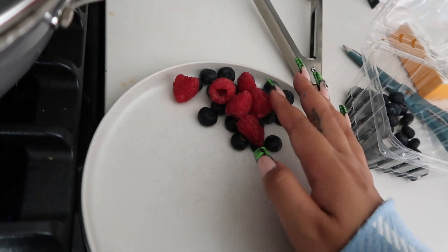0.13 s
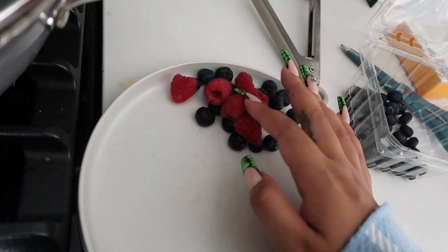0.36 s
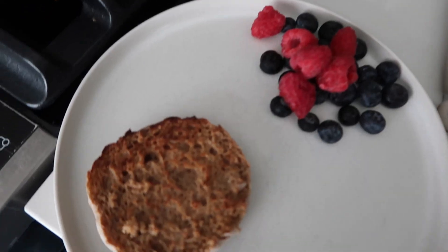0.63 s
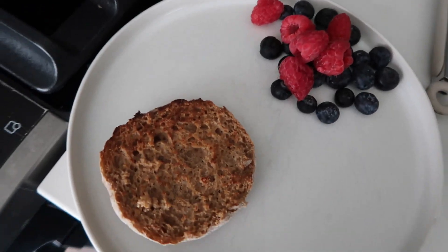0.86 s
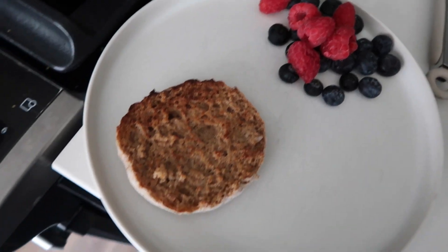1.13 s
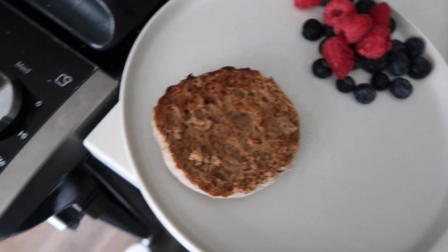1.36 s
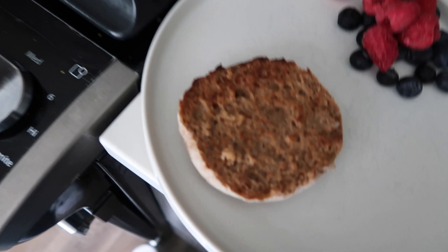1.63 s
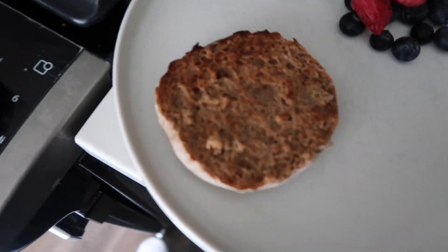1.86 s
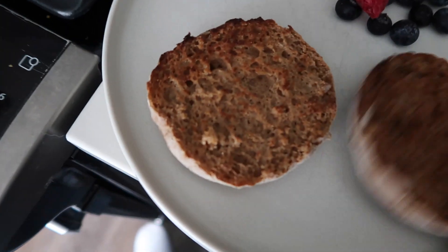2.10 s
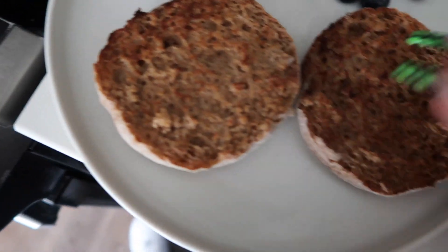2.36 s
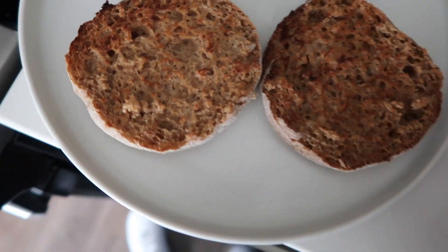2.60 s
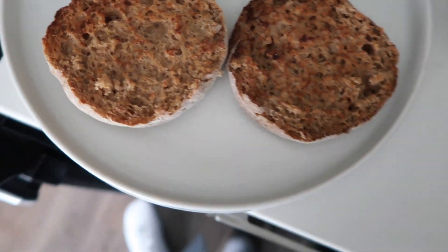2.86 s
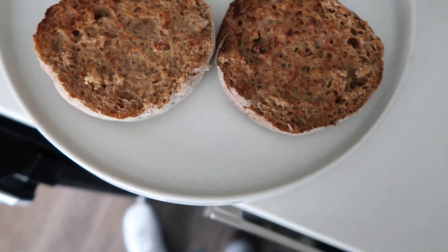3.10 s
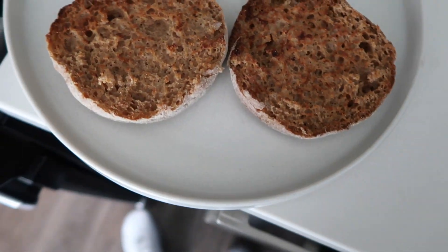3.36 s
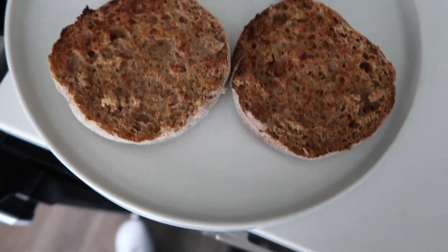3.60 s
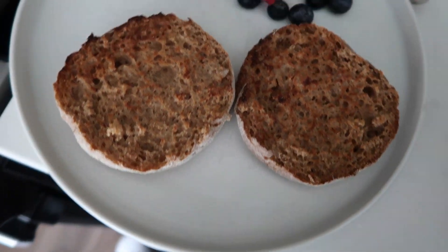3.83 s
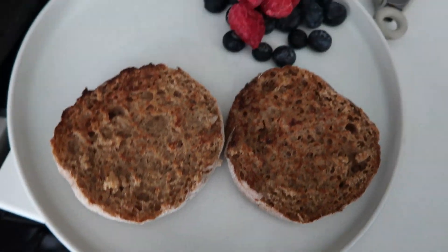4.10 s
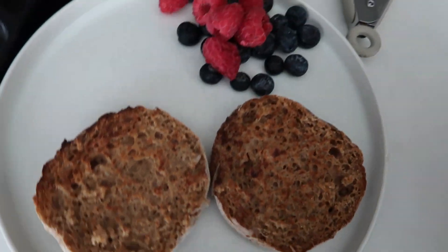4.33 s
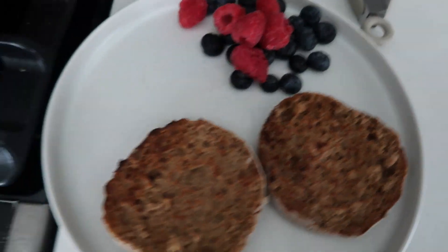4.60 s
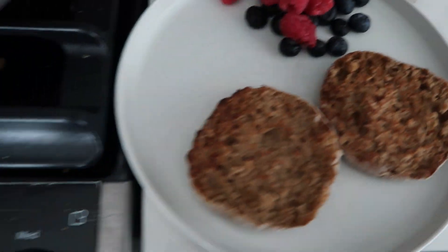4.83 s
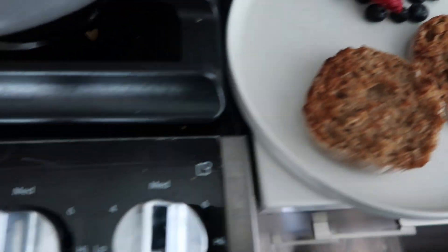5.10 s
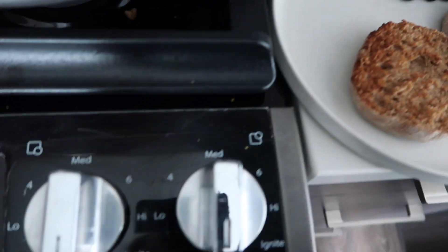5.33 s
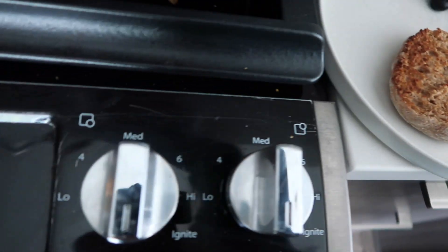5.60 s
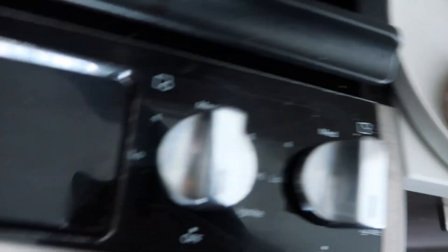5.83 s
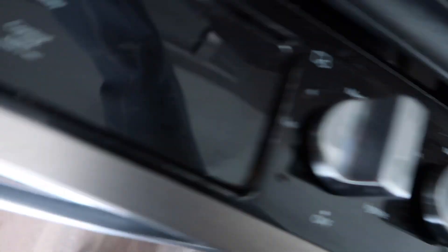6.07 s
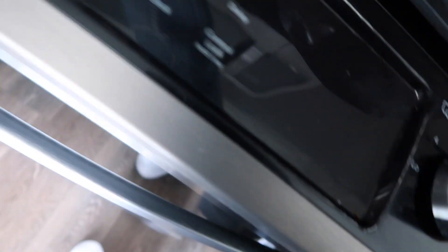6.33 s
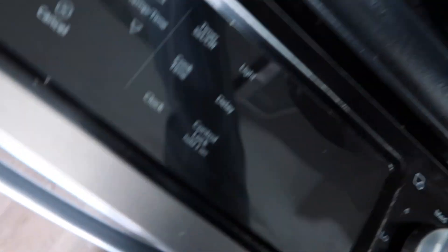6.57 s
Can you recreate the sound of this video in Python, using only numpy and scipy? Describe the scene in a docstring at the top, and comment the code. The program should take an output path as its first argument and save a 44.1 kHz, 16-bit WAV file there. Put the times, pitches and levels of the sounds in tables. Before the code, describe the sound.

Close in a home kitchen, fat sizzles and spits softly over faint room air and hum. Light taps and brushes touch the counter, then toast clatters onto a ceramic plate. A wooden drawer slightly to the right knocks, slides grittily and stops. After quieter sizzling and small ticks, the pan flares with hiss, a thin steam whistle and snapping drops. Finally an oven door bangs open, loud and rattling. Handheld stereo microphone.

```python
"""A home kitchen, heard close by a hand-held camera. Fat sizzles and spits from the start: dense random clicks,
coloured, also ring the pan. Under it lie filtered-noise room air, drone and thumps. Taps ring counter modes and
noise grains brush; at 2.1 s toast rings a plate, and from 2.8 s a drawer knocks loose, slides as resonant grit
and stops. From 5.3 s the tilted pan flares, steam whistles as a wandering tone and drops snap as noise clicks.
At 6.4 s an oven door is pulled open: loud blows and chatter ring sheet metal. Sparse echoes add the kitchen."""
import sys
import numpy as np
from scipy import signal
from scipy.fft import rfft, irfft, next_fast_len
from scipy.io import wavfile
from scipy.ndimage import uniform_filter1d, map_coordinates

SR = 44100
rng = np.random.default_rng(int(sys.argv[2]) if len(sys.argv) > 2 else 0)


def log_audio(samples):
    """Write samples as a 16-bit WAV file to the path given in sys.argv[1]."""
    # one column per channel
    frames = np.atleast_2d(samples).T
    # limit to full scale, then quantise
    limited = np.clip(frames, -1, 1)
    pcm = np.round(limited * 32767).astype(np.int16)
    wavfile.write(sys.argv[1], SR, pcm)


def volts_from_db(level):
    """Convert decibel levels to linear amplitude ratios."""
    exponent = np.asarray(level, float) / 20
    return 10 ** exponent


N = 295470
HZ = np.fft.rfftfreq(next_fast_len(N + SR), 1 / SR)  # frequency axis for colouring

# colour of the sizzling fat: (frequency [Hz], relative level per Hz [dB])
FIZZ_COLOUR = [(180, -25), (300, 6), (397, 0), (600, 4.5), (835, 4.5), (1070, 5), (1390, 1.5), (2570, 3.5),
               (5770, 0.5), (13000, -2), (15500, -21)]
# resonances of the pan: (frequency after the opening [Hz], width [Hz], relative level [dB])
PAN_MODES = [(1030, 27, 6.5), (1659, 11, 5), (2444, 42, 0), (2923, 24, 7), (3366, 16, 0), (4370, 18, 3),
             (4790, 58, -3), (5370, 36, -3), (5920, 45, 0), (9070, 100, 4), (11130, 320, 10.5),
             (13300, 110, 3.5)]
# fat spitting: (time [s], level before the rise and fall [dB])
FAT_SPITS = [(0.0024, -45), (0.0644, -49), (0.129, -38.5), (0.1894, -49), (0.373, -40), (0.4, -36.5),
             (0.437, -37), (0.4644, -36.5), (1.4694, -49), (1.7094, -48), (5.163, -41.5), (5.4544, -35),
             (5.6094, -40), (5.6371, -39), (5.697, -32), (5.7538, -35), (5.948, -42.5), (6.0194, -35),
             (6.0844, -43), (6.342, -42)]
# treble of the fizz against its middle: (time [s], level [dB])
FIZZ_TREBLE = [(0, -1.5), (.2, 3), (.8, 2), (2, 8.5), (3.7, 1.5), (4.2, 4.5), (5.1, 6), (5.4, -2),
               (5.9, -3.1), (6.1, -11), (6.4, -8)]
# how hard the bursts drive the pan: (time [s], level [dB])
PAN_DRIVE = [(0, -21.5), (.4, -23.5), (.55, -31), (1.4, -35.5), (1.8, -31), (4.2, -35.5), (5, -28),
             (5.2, -30.5), (5.35, -26)]
# the pan's ring fades out under the flare: (from [s], to [s])
RING_FADE = (5.3, 5.5)
# colour of the quiet air: (frequency [Hz], relative level per Hz [dB])
AIR_COLOUR = [(12, -27), (20, -5.5), (197, -1.5), (232, -4.5), (287, -1), (346, -3), (691, -7.5),
              (927, -11.5), (1070, -9), (3000, -19), (3900, -49), (6600, -120)]
# left-right likeness of the air: (frequency [Hz], likeness from -1 to 1 [no unit])
AIR_LIKENESS = [(60, 1), (180, 0.7), (550, 0.14), (1650, 0.46), (4970, -0.91), (15000, -0.02)]
# appliance drone: (frequency [Hz], width [Hz], level [dB])
DRONE = [(96, 1.6, -61), (192.6, 8, -65.5), (63, 13, -63)]
# low thumps, and one faint swell of the drone at 1.8 s: (time [s], level [dB], centre [Hz])
LOW_THUMPS = [(0.01, -45, 140), (.36, -44, 132), (1.8, -63, 96), (2.25, -37, 170), (2.87, -48, 124),
              (3.13, -51, 180), (3.35, -52.5, 185), (3.59, -43, 169), (4.07, -62, 104), (4.75, -51.5, 103),
              (5.17, -46.5, 102.5), (5.5, -55, 170)]
# small things ticking: (time [s], middle peak [dB], middle centre [Hz], low peak [dB], treble peak [dB])
SMALL_TAPS = [(.361, -61, 506, -45, -48), (.989, -42, 600, -37, -24), (1.03, -47, 447, -40, -56),
              (1.255, -51, 420, -44.5, -58), (1.272, -43, 1870, -37, -56), (4.073, -51, 2900, -61, -30),
              (4.203, -38, 1800, -62, -54), (4.232, -34, 2270, -55, -23), (5.173, -42, 454, -44, -48),
              (6.205, -34, 1950, -52, -46)]
# modes of the counter: (frequency [Hz], relative level [dB], t60 undamped [s])
COUNTER_MODES = [(140, 12, 0.13), (338, 4, 0.48), (383, 5, 0.26), (730, 4, 0.1), (1034, 5, 0.18),
                 (1870, -3.5, 0.2), (2920, 2, 0.04), (4410, 4.5, 0.071), (7830, 10.5, 0.032)]
# how fast the kitchen's reflections die: (frequency [Hz], t60 [s])
KITCHEN_DECAY = [(150, 0.41), (700, 0.53), (3000, 0.46), (10000, 0.28)]
# fingers and cloth brushing the counter: (time [s], length [s], level before fades [dB], centre [Hz])
BRUSHES = [(0.512, 0.024, -43, 1700), (0.534, 0.04, -43.5, 1180), (0.56, 0.03, -43, 2000),
           (0.838, 0.032, -49, 1200), (0.977, 0.044, -43, 3500), (1.015, 0.073, -59, 700),
           (1.259, 0.056, -53, 500), (2.245, 0.053, -44.5, 3800), (4.32, 0.05, -54, 896),
           (4.75, 0.019, -58, 500)]
# toast landing: (time [s], middle peak [dB], middle centre [Hz], low peak [dB], treble peak [dB])
TOAST_BLOWS = [(2.096, -23.5, 1390, -34, -32), (2.108, -41, 614, -30.5, -31),
               (2.136, -29.5, 1200, -35, -46), (2.160, -24, 2260, -35.5, -35), (2.173, -38, 1500, -41, -40),
               (2.184, -13, 1900, -27.5, -2.5), (2.198, -19.5, 2340, -32, -43),
               (2.227, -17.5, 906, -23, -42), (2.243, -39, 1100, -33, -47), (2.288, -55, 900, -39, -28)]
# modes of the ceramic plate: (frequency [Hz], relative level [dB], t60 undamped [s])
PLATE_MODES = [(170, 7.5, 0.091), (420, 16.5, 0.016), (870, -5, 0.057), (1160, 4, 0.026),
               (1470, -20, 0.035), (2310, 2.5, 0.12), (2450, -22, .07), (4100, -3, 0.093), (5010, 3.5, .06),
               (5760, 3.5, 0.052), (6310, 6, 0.037), (8600, 0, .05), (9350, -0.5, 0.057),
               (12300, 11, 0.049)]
# knocks on the drawer, before panning:
# (time [s], middle peak [dB], middle centre [Hz], low peak [dB], treble peak [dB])
DRAWER_KNOCKS = [(2.837, -16.5, 760, -36, -31), (2.862, -15.5, 1130, -25.5, -25.5),
                 (3.382, -18.5, 3000, -45, -37), (3.434, -19, 1370, -49, -43),
                 (3.596, -18.5, 1950, -27, -29), (3.608, -30, 593, -29, -36), (3.625, -34, 910, -40, -34),
                 (3.65, -35, 800, -47, -47), (3.667, -34, 880, -52, -50), (3.685, -41, 800, -48, -50)]
# modes of the wood: (frequency [Hz], relative level [dB], t60 undamped [s])
WOOD_MODES = [(120, 6, 0.21), (332, -8, 0.091), (436, 1.5, 0.094), (523, 8, 0.03), (806, 5.5, 0.053),
              (902, -1.5, 0.087), (1160, -1.5, .06), (1360, 0, 0.044), (2000, -1, 0.035),
              (2780, 3.5, 0.057), (4670, 7.5, .03)]
# drawer on its runners, before panning: (time [s], speed as level [dB], hollow of the box [Hz])
DRAWER_SLIDE = [(2.89, -51, 1160), (2.96, -44, 770), (3.146, -34.5, 760), (3.218, -32, 1380),
                (3.43, -32, 1470), (3.585, -45.5, 878)]
# colour of the rubbing as heard, with the top treble cut away: (frequency [Hz], relative level per Hz [dB])
RUBBING_COLOUR = [(180, -55), (300, -37), (345, -35), (556, -5.5), (940, -7.5), (1400, -6.5), (1830, -9.5),
                  (2860, -2), (3600, -6), (5630, -4.5), (10400, -10.5), (11500, -8), (12000, -87),
                  (15600, -122), (22000, -120)]
# steam escaping as the pan tilts: (time [s], centre pitch [Hz], level [dB])
STEAM_WHISTLE = [(5.261, 1006, -67), (5.351, 1090, -54), (5.42, 1125, -51.5), (5.47, 1110, -66)]
# single drops bursting in the flare: (time [s], peak [dB])
DROP_SNAPS = [(5.451, -29), (5.4624, -25), (5.4774, -24), (5.6034, -20), (5.6134, -19), (5.6264, -19),
              (5.6373, -15.5), (5.6984, -24), (5.755, -18)]
# blows on the oven door: (time [s], middle peak [dB], middle centre [Hz], low peak [dB], treble peak [dB])
DOOR_BLOWS = [(6.396, -6.5, 990, -1.5, -19), (6.43, -13, 1510, -13.5, -32), (6.462, -16, 1520, -10, -23.5),
              (6.492, -10.5, 2000, -17, -42), (6.539, 0.5, 2360, -6, -8.5), (6.566, 0, 950, -14, -8.5),
              (6.584, -9, 1500, -33, -17)]
# modes of the sheet metal: (frequency [Hz], relative level [dB], t60 before extra damping [s])
DOOR_MODES = [(81, -15, 0.27), (136, -2, 0.39), (262, -12, 0.51), (340.5, -1.5, 0.86), (474, -30, 0.19),
              (664.3, -1.5, 0.098), (714, -10, 0.19), (968, -9.5, 0.18), (1420, -3, 0.4), (1494, 2, 0.67),
              (1706, -20, 0.34), (1950, -13, 0.37), (2480, -9.5, 0.41), (2800, -19, 0.18),
              (3380, -18, 0.51), (3500, -14, 0.43), (4400, -20, 0.27), (4900, -16.5, .2), (5960, -23, .1)]
# door and racks shaking: (time [s], drive level [dB], gain of the treble band [dB])
DOOR_RATTLE = [(6.398, -6.5, -5.5), (6.425, -29.5, -40), (6.455, -16.5, -23), (6.53, -18.5, -30),
               (6.542, -5, -23), (6.56, -13.5, -7), (6.575, -8.5, -11.5), (6.63, -16, -21),
               (6.7, -34.5, -25)]

SIMMER_DB, OPENING_DB = -54.5, 4  # steady sizzle, and how much louder the sizzle sounds in the opening
OPENING_END_S, OPENING_PITCH = 0.533, 0.98  # in the opening the pan's ring is heard a little lower in pitch (ratio)
FLARE_S, FLARE_RISE_S = 5.318, 0.12  # the fat flares up
FLARE_DB, FLARE_FALL_DB_PER_S = -31.5, 13  # and calms down; level of the fall before the rise is applied
WET_DB, WET_OPENING_DB, WET_FLARE_DB = -4.5, -15, -5.5  # low fizz gain: simmering, opening, flaring
SPIT_RISE_S, SPIT_T60_S = 0.0042, 0.051
ROOM_DB = -53.5
THUMP_RISE_S, THUMP_FALL_S = 0.056, 0.076
GRIP_DB = -65.5  # faint rumble of the grip between the thumps


def evened(x):
    """Scales to rms 1."""
    return x / np.sqrt(np.mean(x ** 2) + 1e-20)


def read(points, hz):
    """Reads a spectrum along a log frequency axis."""
    f, value = np.transpose(points)
    return np.interp(np.log(hz + 1), np.log(f + 1), value)


def curves(rows):
    """Draws each column of a timed table as a curve, one value a sample."""
    s, *columns = np.transpose(rows)
    return [np.interp(np.arange(N) / SR, s, c) for c in columns]


def coloured(x, points):
    """Passes x through a spectrum and scales it to rms 1."""
    spectrum = rfft(x, 2 * len(HZ) - 2) * volts_from_db(read(points, HZ))
    return evened(irfft(spectrum)[..., :N])


def band(x, lo_hz, hi_hz):
    """Causal band-pass."""
    return signal.sosfilt(signal.butter(2, [lo_hz, hi_hz], "bandpass", fs=SR, output="sos"), x)


def below(x, hz):
    """The part of x under hz, without delay."""
    return signal.sosfiltfilt(signal.butter(2, hz, fs=SR, output="sos"), x)


def resonate(x, hz, width):
    """A resonance of gain 1 that follows the curve hz: shift down to 0 Hz, smooth, shift back."""
    turn = np.exp(2j * np.pi * np.cumsum(hz * np.ones(len(x))) / SR)
    r = np.exp(-np.pi * width / SR)
    return 2 * (turn * signal.lfilter([1 - r], [1, -r], x / turn)).real


def ports(x, lead):
    """Two microphone ports a finger apart: sound reaches the left one lead samples earlier."""
    at = np.arange(len(x)) + np.array([[.5], [-.5]]) * lead
    return np.array([map_coordinates(x, [a], order=5, mode="nearest") for a in at])


def crackle(per_s, spread_db):
    """Sparse clicks of random sign, a few of them large."""
    size = volts_from_db(spread_db * np.minimum(rng.exponential(1, N), 5))
    sign = np.sign(rng.standard_normal(N))
    return evened(size * sign * (rng.random(N) < per_s / SR))


def slow(seconds):
    """Slow random drift of rms 1."""
    size = max(round(seconds * SR), 2)
    return evened(uniform_filter1d(uniform_filter1d(rng.standard_normal(N), size), size))


def patchy(x, depth_db):
    """Drifting louder and softer patches over time and pitch."""
    z = signal.stft(x, nperseg=256, noverlap=192)[2]
    field = uniform_filter1d(rng.standard_normal(z.shape), size=7, axis=0)
    field = uniform_filter1d(field, size=24, axis=1)
    return evened(signal.istft(z * volts_from_db(depth_db * evened(field)), nperseg=256, noverlap=192)[1][:N])


def spits():
    """Level of the spits: each a short swarm of bursts that swells fast and dies away."""
    level = np.zeros(N)
    for s, db in FAT_SPITS:
        t = np.arange(N) / SR - s
        level += volts_from_db(db - 60 * np.maximum(t, 0) / SPIT_T60_S) * np.clip(t / SPIT_RISE_S, 0, 1)
    return level


def pan_ring(pops, surge, opening):
    """The bursts strike the pan's modes until the ring fades out."""
    (ring_db,) = curves(PAN_DRIVE)
    fade = np.interp(np.arange(N) / SR, RING_FADE, (1, 0))
    drive = pops * surge ** 1.1 * volts_from_db(ring_db + 0.92 * slow(0.023)) * fade
    pitch = 1 - (1 - OPENING_PITCH) * opening
    return sum(volts_from_db(db) * resonate(drive, hz * pitch, width) / np.sqrt(width) for hz, width, db in PAN_MODES)


def sizzle():
    """Tiny steam bursts in fat: they fizz, ring the pan, swarm in spits and swell in the flare."""
    time = np.arange(N) / SR
    opening = np.clip((OPENING_END_S - time) / .04, 0, 1)  # 1 at first, then a short fade to 0
    rising = 1 - np.exp(-np.maximum(time - FLARE_S, 0) / FLARE_RISE_S)
    flare = rising ** 1.67 * volts_from_db(FLARE_DB - FLARE_FALL_DB_PER_S * (time - FLARE_S))
    steady = volts_from_db(SIMMER_DB + OPENING_DB * opening) + flare
    level = steady * volts_from_db(0.88 * slow(0.0063)) + spits()
    pops = crackle(6000, 2.43) + 0.83 * rng.standard_normal(N)
    ring = pan_ring(pops, level / steady, opening)

    bursts = patchy(coloured(pops, FIZZ_COLOUR), 2.3)  # different spots of fat seethe
    low, low_and_middle = below(bursts, 1650), below(bursts, 6900)
    wet_db = WET_DB + (WET_OPENING_DB - WET_DB) * opening + (WET_FLARE_DB - WET_DB) * rising
    (treble_db,) = curves(FIZZ_TREBLE)
    fizz = volts_from_db(wet_db) * low + low_and_middle - low + volts_from_db(treble_db) * (bursts - low_and_middle)

    flare_share = flare / steady  # as it grows, the fizz moves to the middle
    noise = coloured(rng.standard_normal((2, N)), FIZZ_COLOUR)
    # treble hiss that differs between left and right
    wide_hiss = (1 - flare_share) * (below(noise, 6100) - below(noise, 4070))
    wide_hiss += volts_from_db(-4.5) * flare_share * (below(noise, 7400) - below(noise, 5600))
    wide_hiss += volts_from_db(treble_db - 2.0) * (noise - below(noise, 8850))
    return ports(level * fizz + ring, 1.52 * (1 - flare_share) ** 0.59) + volts_from_db(8) * level * wide_hiss


def air():
    """Quiet air of the house: coloured noise, its two sides alike by frequency."""
    a, b = rfft(rng.standard_normal((2, 2 * len(HZ) - 2)))
    same = np.clip(read(AIR_LIKENESS, HZ), -1, 1)
    pair = irfft([a, same * a + np.sqrt(1 - same ** 2) * b])
    return volts_from_db(ROOM_DB) * coloured(pair, AIR_COLOUR)


def drone():
    """Appliance drone: noise through narrow resonances."""
    return sum(volts_from_db(db) * evened(resonate(rng.standard_normal(N), hz, width)) for hz, width, db in DRONE)


def low_rumble():
    """Lumpy resonant noise: the faint rumble of the grip, low thumps and one faint swell of the drone."""
    s, db, hz = np.transpose(LOW_THUMPS)[:, :, None]
    t = np.arange(N) / SR - s
    swells = volts_from_db(db) * np.exp(np.where(t < 0, t / THUMP_RISE_S, -t / THUMP_FALL_S))
    level = swells.sum(0) + volts_from_db(GRIP_DB)
    centre_hz = ((swells * hz).sum(0) + volts_from_db(GRIP_DB) * 120) / level  # the loudest weighs most
    lumps = rng.standard_normal(N) * volts_from_db(3.7 * slow(0.023))
    thud = resonate(resonate(lumps, centre_hz, 170), centre_hz, 163)
    thud += volts_from_db(-17.5) * band(lumps, 28, 104) + volts_from_db(-11) * band(lumps, 228, 420)
    return level * evened(thud)


def blows(rows, modes, soft_t60, dull, crack_db, crack_t60, lead):
    """Each blow rings the modes unevenly under a noisy crack, with low, middle and treble set apart."""
    out, t = np.zeros(N + SR), np.arange(SR // 4) / SR
    hz, mode_db, mode_t60 = np.transpose(modes)[:, :, None]
    luck = rng.standard_normal((len(rows), len(modes), 1))
    for (s, mid_db, mid_hz, low_db, top_db), chance in zip(rows, luck):
        t60 = soft_t60 * (1000 / mid_hz) ** dull  # duller blows last longer
        # the hand damps the ring, high modes most
        decay = 1 / np.maximum(mode_t60, .01) + (hz / 1000) ** 0.39 / max(t60, .01)
        ring = (volts_from_db(mode_db + 2 * chance - 60 * t * decay) * np.sin(2 * np.pi * hz * t)).sum(0)
        crack = volts_from_db(crack_db - 60 * t / crack_t60) + volts_from_db(crack_db - 9 - 60 * t / max(t60, .01))
        grain = rng.standard_normal(len(t)) * crack
        body = (ring / abs(ring).max() + grain) * np.minimum(t / 0.00035, 1)  # contact builds up
        low = band(body, 173, 664)
        middle = band(body, mid_hz / 1.6, mid_hz * 1.75)
        treble = band(body, 2870, 12100)
        for db, part in ((low_db, low), (mid_db, middle), (top_db, treble)):
            out[round(s * SR):][:len(t)] += volts_from_db(db) * part / abs(part).max()
    return ports(out[:N], lead)


def taps():
    """Small things tick on the counter and ring its modes."""
    return blows(SMALL_TAPS, COUNTER_MODES, soft_t60=0.14, dull=1.0, crack_db=-7.5, crack_t60=0.022, lead=1.7)


def kitchen(x):
    """Sparse reflections of random sign, each band dying at its own speed."""
    echoes = np.zeros((2, SR // 2))
    slots = np.arange(130, SR // 2 - 20, 20)  # one reflection in every 20 samples
    at = slots + rng.integers(0, 20, (2, len(slots)))
    at[1] = np.where(rng.random(at.shape[1]) < .75, at[0], at[1])  # most reach both ports alike
    np.put_along_axis(echoes, at, rng.choice([-1., 1.], at.shape[1]) * np.ones(at.shape), 1)
    hz, t, z = signal.stft(echoes, SR, nperseg=256)
    tail = signal.istft(z * volts_from_db(-60 * t / read(KITCHEN_DECAY, hz)[:, None]), SR, nperseg=256)[1]
    return signal.fftconvolve(x.mean(0)[None], tail / np.linalg.norm(tail[0]), axes=1)[:, :N]


def rustles():
    """Fingers and cloth brush the counter: short soft swarms of uneven noise grains."""
    out = np.zeros(N)
    for s, length, db, hz in BRUSHES:
        size = round(length * SR)
        grain_db = 2.4 * rng.standard_normal(size // 60 + 1).repeat(60)[:size]
        grit = evened(band(rng.standard_normal(size) * volts_from_db(grain_db), hz / 6.9, hz * 1.63))
        out[round(s * SR):][:size] += volts_from_db(db) * grit * signal.windows.tukey(size, .7)
    return ports(out, 2.1)


def toast():
    """Toast is set on a ceramic plate and rings its modes."""
    return blows(TOAST_BLOWS, PLATE_MODES, soft_t60=0.068, dull=0.16, crack_db=-11, crack_t60=0.0058, lead=1.6)


def drawer_knocks():
    """The drawer is knocked loose and stopped: blows ring its wood."""
    return blows(DRAWER_KNOCKS, WOOD_MODES, soft_t60=0.071, dull=0.91, crack_db=-7.5, crack_t60=0.029, lead=-2.0)


def drawer_slide():
    """Gritty rubbing on the runners excites the hollow of the box, whose pitch moves as it slides."""
    speed_db, hollow_hz = curves(DRAWER_SLIDE)
    t = np.arange(N) / SR
    starting = np.clip((t - DRAWER_SLIDE[0][0]) / 0.02, 0, 1)
    stopping = np.clip((DRAWER_SLIDE[-1][0] - t) / 0.0077, 0, 1)
    grit = patchy(coloured(crackle(3500, 1.9) + rng.standard_normal(N), RUBBING_COLOUR), 2.2)
    grit = grit + volts_from_db(1) * resonate(grit, hollow_hz, 180) \
        + volts_from_db(-3) * resonate(grit, 2960, 300) + resonate(grit, 2200, 180)
    level = starting * stopping * volts_from_db(speed_db + 0.7 * slow(0.0055))
    return ports(level * evened(grit), -1.81)


def whistle():
    """Steam escaping from the tilted pan: a narrow tone, slightly fuzzy in pitch and level."""
    hz, level_db = curves(STEAM_WHISTLE)
    first, last = STEAM_WHISTLE[0][0], STEAM_WHISTLE[-1][0]
    on = np.interp(np.arange(N) / SR, [first - .03, first, last, last + 0.035], [0, 1, 1, 0])
    cycles = np.cumsum(hz + 6.4 * slow(0.0096)) / SR
    return np.sqrt(2) * on * volts_from_db(level_db + 2.1 * slow(0.015)) * np.sin(2 * np.pi * cycles)


def snaps():
    """Single drops burst: bright clicks of fast-dying noise."""
    out, t = np.zeros(N), np.arange(200) / SR
    for s, db in DROP_SNAPS:
        click = band(rng.standard_normal(200) * volts_from_db(-60 * t / 0.0035), 1800, 9700)
        out[round(s * SR):][:200] += volts_from_db(db) * click / abs(click).max()
    return ports(out, 0.5)


def door_blows():
    """The oven door is pulled open: hard blows ring its sheet metal."""
    return blows(DOOR_BLOWS, DOOR_MODES, soft_t60=0.056, dull=.2, crack_db=7.5, crack_t60=0.017, lead=0.97)


def rattle():
    """After the latch lets go, hinge and racks keep chattering; chatter and blows ring the sheet metal."""
    quiet = 200  # samples before the chatter starts
    start = round(DOOR_RATTLE[0][0] * SR) - quiet
    level_db, treble_db = (c[start:] for c in curves(DOOR_RATTLE))
    level = volts_from_db(level_db) * (np.arange(N - start) > quiet)
    chatter = crackle(2500, 3.2)[start:] * level
    drive = volts_from_db(-4) * chatter
    for s, mid_db, *_ in DOOR_BLOWS:
        drive[round(s * SR) - start] += volts_from_db(mid_db + 18.5)
    # a shorter t60 makes a wider resonance; the last term is extra damping
    ring = sum(volts_from_db(db) * resonate(drive, hz, 1.95 / max(t60, .03) + 3.6) for hz, db, t60 in DOOR_MODES)
    noise = chatter + level * rng.standard_normal(N - start)
    clank = volts_from_db(4) * band(noise, 77, 1120) + volts_from_db(-3.5) * band(noise, 1090, 3080)
    clank += volts_from_db(treble_db) * band(noise, 2100, 5540)
    return np.pad(ports(volts_from_db(20.0) * ring + clank, 0.91), ((0, 0), (start, 0)))


def scene():
    """Everything in the kitchen, the drawer to the right, with reflections of the handled things."""
    right = volts_from_db(np.array([[-1.2], [1.2]]))
    small = taps() + rustles() + toast() + right * (drawer_knocks() + drawer_slide())
    door = door_blows() + rattle()
    reflections = kitchen(volts_from_db(-10.5) * small + volts_from_db(-30) * door)
    pan = sizzle() + whistle() + snaps()
    room = air() + drone() + low_rumble()
    return pan + room + small + door + reflections


def roll_off(x):
    """The treble ends steeply here."""
    return signal.sosfilt(signal.butter(12, 15690, fs=SR, output="sos"), x)


def record(dry):
    """Clips the mix at full scale and finishes it."""
    mix = np.clip(dry, -1, 1)
    return roll_off(mix)


dry = scene()
out = record(dry)
log_audio(out)
```